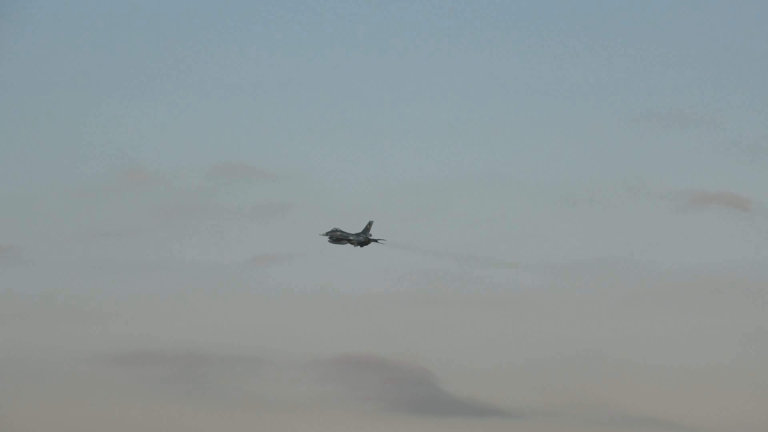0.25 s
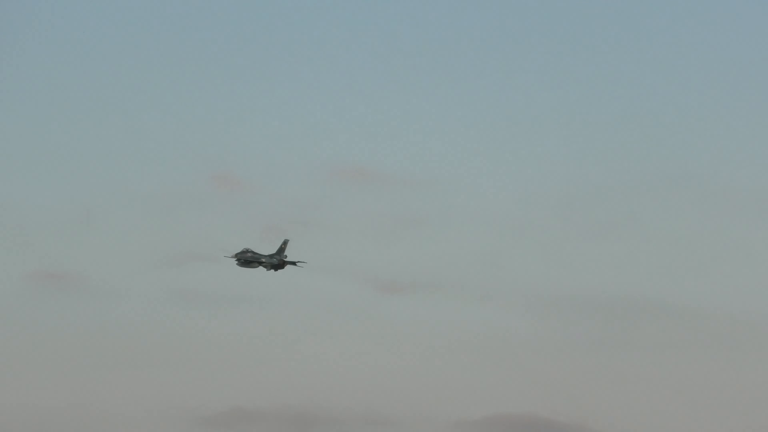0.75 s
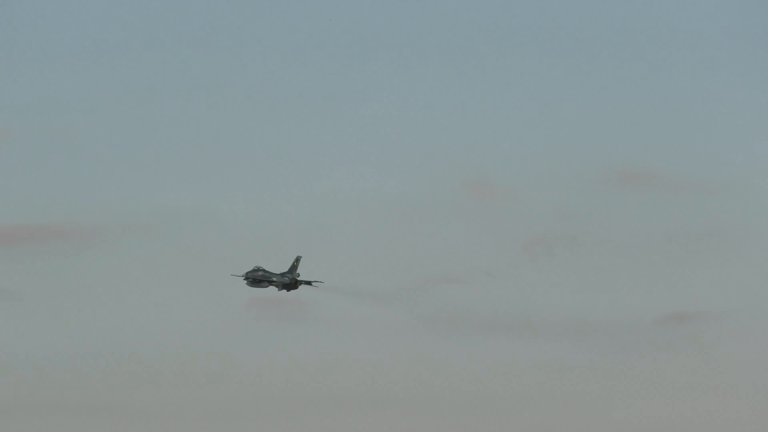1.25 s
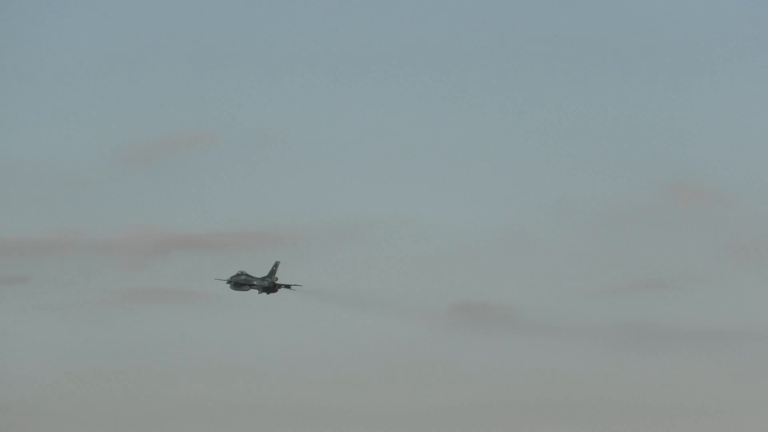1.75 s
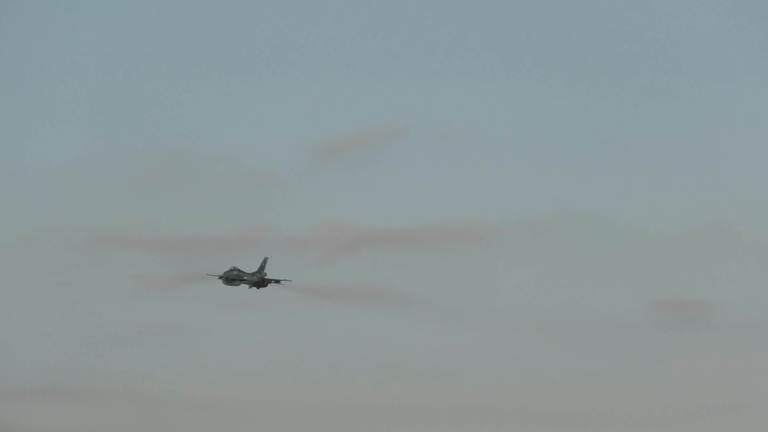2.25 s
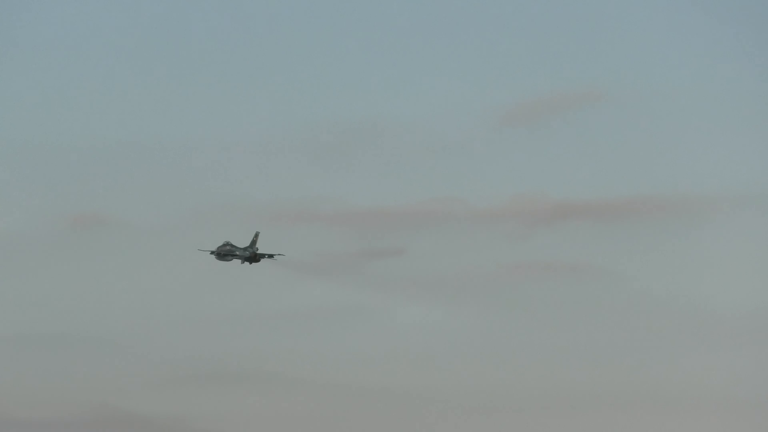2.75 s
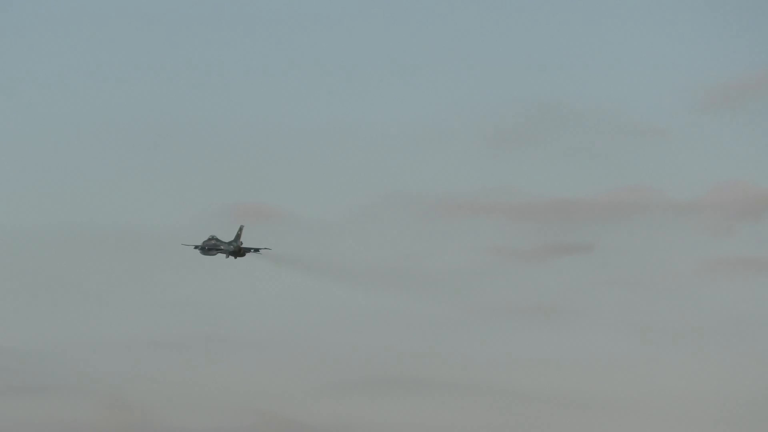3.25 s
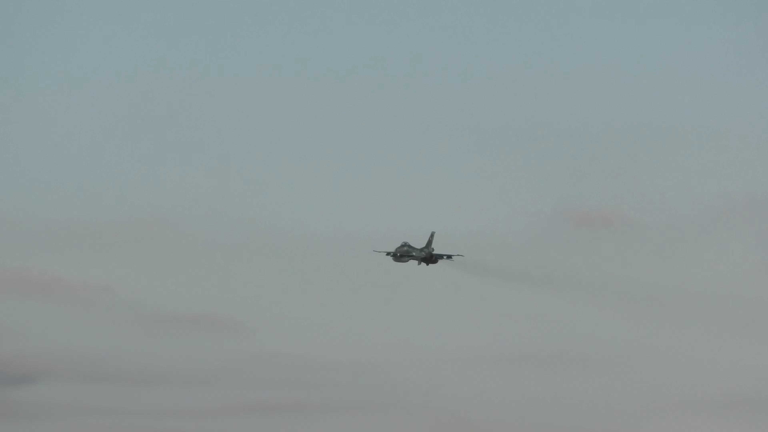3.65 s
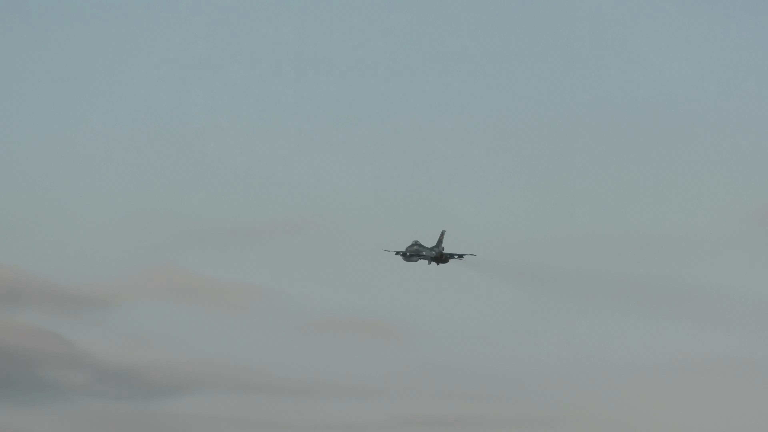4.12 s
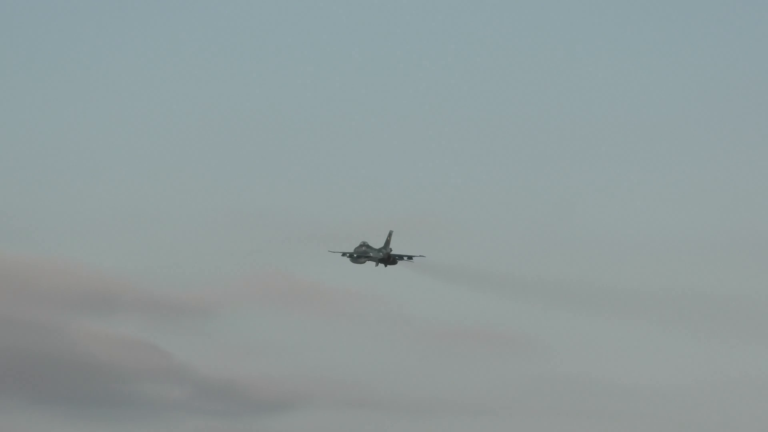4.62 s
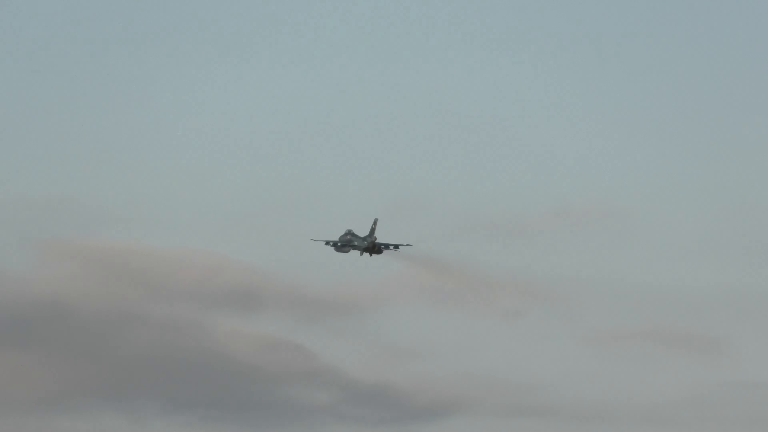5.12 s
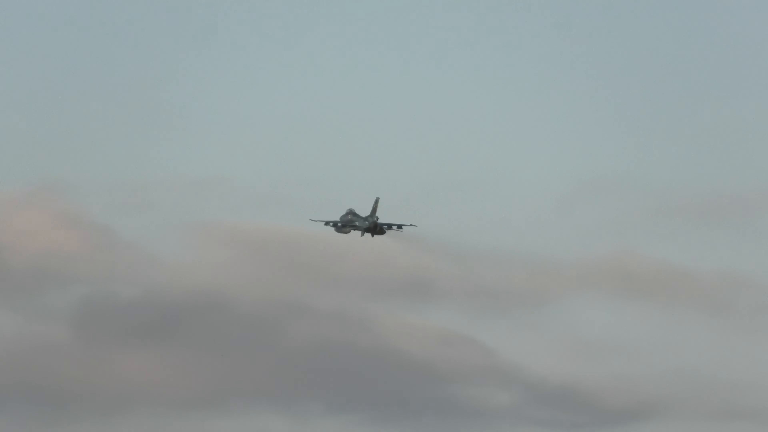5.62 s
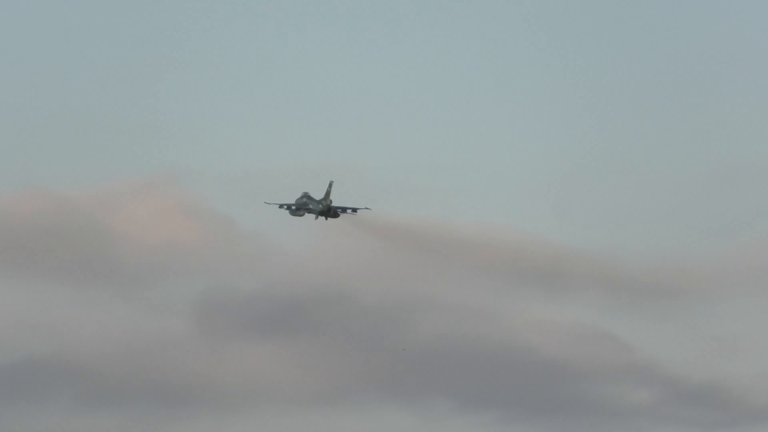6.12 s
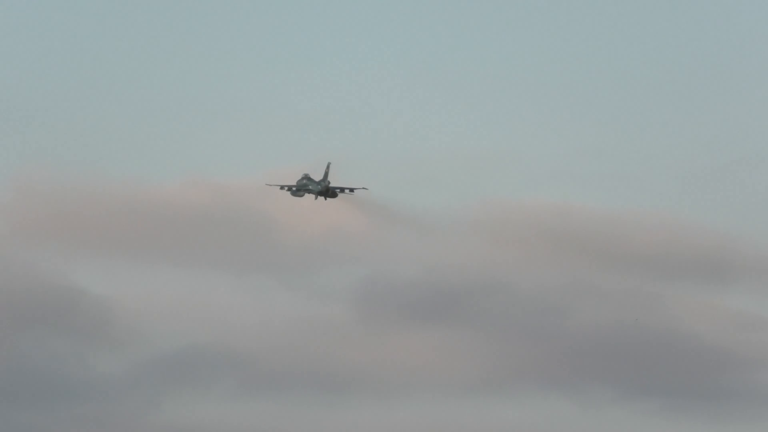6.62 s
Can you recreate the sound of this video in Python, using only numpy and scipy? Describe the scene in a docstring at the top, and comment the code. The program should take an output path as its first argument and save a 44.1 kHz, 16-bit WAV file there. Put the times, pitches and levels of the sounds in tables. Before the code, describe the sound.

A single jet fighter passes far off over an open grassy airfield. A thick roar and low rumble run throughout, covered by dense, ripping crackle. The first seconds are brightest, with sharp snapping bursts; pitch sinks between one and two seconds, then the crackle grows duller and more separated. A distant outdoor stereo microphone hears a hollow ground reflection and faint hiss.

```python
"""A far-off jet fighter rumbles, roars and crackles over an airfield, in bursts of steep shock fronts.
Turbulent mixing in the exhaust is shaped noise; the shock fronts are pressure jumps at random times.
The sound arrives directly and off the ground: the drifting lag sweeps a comb through the roar.
Scattering adds a treble hiss; two microphone ports hear the wave, and a quick gain control evens its level."""
import sys
import numpy as np
from scipy import signal
from scipy.fft import rfft, irfft, next_fast_len
from scipy.io import wavfile
from scipy.ndimage import uniform_filter1d, map_coordinates

SR = 44100
rng = np.random.default_rng(int(sys.argv[2]) if len(sys.argv) > 2 else 0)


def wav_out(sig):
    """Save sig, one row per channel (or a flat mono array), as 16-bit PCM at SR to the path in sys.argv[1]."""
    wavfile.write(sys.argv[1], SR, np.round(np.clip(np.atleast_2d(sig).T, -1, 1) * 32767).astype(np.int16))


N = 302967

# Relative colour of the steep shock edges: hz, level_db
SNAP_SPECTRUM = [(1200, -38), (2200, -4), (3000, -2), (4000, -1.5), (5000, -7.5), (6000, -9.5),
                 (7500, -19.5), (9000, -25), (12000, -25.5), (15000, -42.5)]
SHOCK_RANGE_DB = 10  # spread of the front sizes before merging


def amp(db):
    """A level in decibels is the logarithm of an amplitude ratio: return that ratio."""
    return 10 ** (np.asarray(db) / 20)


def unit(x):
    """Normalise the mean power: scale to rms 1."""
    return x / np.sqrt(np.mean(x ** 2) + 1e-20)


def along(points, hz):
    """Interpolate (hz, value) points on a logarithmic frequency axis."""
    f, v = np.transpose(points)
    return np.interp(np.log(hz + 1), np.log(f + 1), v)


def curves(rows):
    """Interpolate in time: one value per sample for each column after start_s."""
    s, *columns = np.transpose(rows)
    return [np.interp(np.arange(N) / SR, s, column) for column in columns]


def wobble(rate):
    """Band-limited random modulation: a spline through rate random knots a second."""
    knots = rng.standard_normal(int(N * rate / SR) + 4)
    return map_coordinates(knots, [np.arange(N) * rate / SR])


def filtered(x, response):
    """Linear filtering: multiply the spectrum of x by a complex response of frequency."""
    m = next_fast_len(N + SR // 2)
    spectrum = rfft(x, m) * response(np.fft.rfftfreq(m, 1 / SR))
    return irfft(spectrum, m)[..., :N]


def noise(spectrum, pitch):
    """Coloured noise of rms 1; reading it at a varying speed scales all its frequencies by pitch."""
    still = filtered(rng.standard_normal(N), lambda hz: amp(along(spectrum, hz)))
    return unit(map_coordinates(still, [np.cumsum(pitch)], mode="mirror"))


def running_rms(x, seconds):
    """Short-time level: the root of the power averaged twice over a sliding window."""
    width = max(int(seconds * SR), 2)
    power = uniform_filter1d(uniform_filter1d(x ** 2, width), width)
    return np.sqrt(np.abs(power) + 1e-12)


def bell(s, length):
    """Gaussian envelope in time, 1 at its centre and 1/e at half its length to either side."""
    return np.exp(-(2 * (np.arange(N) / SR - s) / length) ** 2)


def plume(rumble_db=-14.5, roar_db=0.0, flutter_db=0.4, doppler_share=.75):
    """Turbulent mixing behind the nozzle radiates broadband noise: a wandering rumble and a fluttering roar."""
    # Relative colour of the rumble: hz, level_db
    rumble_spectrum = [(12, -13), (25, -15.5), (55, -1), (85, 2), (115, 0.5), (160, 2), (235, 1), (290, -5),
                       (335, -7.5), (500, -11), (1200, -71), (4000, -130)]
    # Wandering weight of the rumble: start_s, pitch_factor
    rumble_pitch = [(0, 1.254), (.95, 1.204), (1.6, 1.05), (2.15, 1.0), (3.1, 0.99), (4.3, 1.02),
                    (5, 1.124), (5.8, 0.99), (6.87, 0.99)]
    # Relative colour of the roar: hz, level_db
    roar_spectrum = [(150, -41), (315, -8.5), (420, -1), (530, -3), (680, -0.5), (1000, -9.5), (1400, -11),
                     (2200, -26), (4000, -47), (8000, -130)]
    # Roar level before its offset and flutter: start_s, level_db
    roar_level = [(0.0, -18), (0.75, -18), (1.35, -19), (1.5, -24.5), (1.95, -19.5), (2.15, -23.5),
                  (2.33, -19), (2.75, -23.5), (3.1, -17.5), (3.3, -20.5), (3.55, -20), (4.1, -23),
                  (4.25, -17), (4.7, -24), (5.45, -19.5), (5.8, -24), (6.65, -23), (6.87, -26.5)]
    # Doppler shift as the jet swings past, before doppler_share: start_s, pitch_factor
    doppler = [(0, 1.25), (.5, 1.276), (1, 1.306), (1.5, 1.103), (2.2, 1.013), (3, 1.02), (4, 1.04),
               (5, 1.05), (6.87, 1.08)]

    rumble = amp(rumble_db) * noise(rumble_spectrum, curves(rumble_pitch)[0])
    level_db = curves(roar_level)[0] + roar_db + flutter_db * wobble(12)
    roar = amp(level_db) * noise(roar_spectrum, curves(doppler)[0] ** doppler_share)
    return rumble + roar


def boom():
    """Narrow-band noise: a band mostly near 150 Hz wanders in pitch and level inside the rumble."""
    # Path of the band: start_s, centre_hz, level_db
    boom_path = [(0, 200, -26), (.5, 190, -28.5), (.9, 185, -23), (1.25, 120, -20), (1.8, 97, -18.5),
                 (2.05, 140, -27.5), (2.25, 165, -20.5), (2.9, 151.8, -20.5), (3.45, 168.1, -20.5),
                 (4.15, 164, -17), (4.4, 142.1, -23.5), (5.2, 138.3, -29.5), (5.7, 155, -26.5),
                 (6.35, 147, -24), (6.87, 104.8, -23.5)]
    # Shape of the band before its pitch is moved: hz, level_db
    boom_shape = [(20, -120), (60, -50), (115, -22), (138, -5), (150, 0), (163, -5), (195, -22), (380, -70),
                  (1000, -170)]
    shape_centre_hz = 150

    centre_hz, level_db = curves(boom_path)
    return amp(level_db) * noise(boom_shape, centre_hz / shape_centre_hz)


def shocks(order=5):
    """Nonlinear steepening merges fronts: one in order, by chance, has swallowed its neighbours and stands out.

    Returns sample times and sizes in dB."""
    rate, spacing = 660, 1.8  # mean fronts a second; evenness of their gaps (1 = pure chance)
    merged_lead_db = 5
    gaps = rng.gamma(spacing, SR / rate / spacing, 2 * rate * N // SR)
    when = np.cumsum(gaps)
    merged = rng.random(len(when)) < 1 / order
    size_db = rng.uniform(-SHOCK_RANGE_DB, 0, len(when)) - merged_lead_db * ~merged
    inside = when < N - 1
    return when[inside], size_db[inside]


def fronts(when, strength, rise_us, spectrum, size=96):
    """A shock front is a hyperbolic-tangent pressure jump: its slope is a pulse as long as the rise time."""
    offset = np.arange(-size, size + 1)
    taps = when.astype(int)[:, None] + offset
    rise = rise_us[:, None] * SR / 10 ** 6  # samples
    steps = np.clip((taps - when[:, None]) / rise, -20, 20)
    slope = strength[:, None] / rise / np.cosh(steps) ** 2
    windowed = slope * np.hanning(len(offset))
    pulses = np.bincount((taps % N).ravel(), windowed.ravel(), N)
    # a quarter turn of phase makes each pulse a jump that relaxes again
    return filtered(pulses - pulses.mean(), lambda hz: -1j * amp(along(spectrum, hz)))


def crackle(when, size_db, crackle_db=-0.83, rasp_db=-3.0):
    """The blunt body of each front carries the lower frequencies: a dense rattle and a separately gusting rasp."""
    # Relative colour of the rattle: hz, level_db
    rattle_spectrum = [(200, -32.5), (680, 1.5), (880, 3.5), (1040, -1.5), (1380, 2.1), (1620, -1),
                       (2100, -17.5), (2700, -30.5), (3500, -34.5), (5000, -62.5), (9000, -110)]
    # Rattle level before crackle_db: start_s, level_db
    rattle_level = [(0.0, -31), (0.15, -20), (0.23, -38), (0.38, -23), (0.53, -31), (0.73, -20.5),
                    (0.83, -35), (1.38, -28), (1.47, -20), (2.05, -22), (2.5, -22.5), (2.63, -19),
                    (2.88, -26.5), (3.3, -22), (3.7, -22), (3.88, -20), (4.35, -29), (4.62, -22.5),
                    (4.8, -24.5), (5.05, -21.5), (5.25, -25.5), (5.45, -29), (5.68, -31), (5.8, -24.5),
                    (5.9, -26), (6.0, -23.5), (6.13, -31), (6.4, -22), (6.68, -32), (6.87, -31.5)]
    # Relative colour of the rasp near 2 kHz: hz, level_db
    rasp_spectrum = [(1100, -41), (1650, -2.5), (2050, 0.5), (2300, -1), (2700, -14), (3500, -18),
                     (5000, -43), (9000, -104)]
    # Rasp level before rasp_db: start_s, level_db
    rasp_level = [(0, -30), (.25, -33), (.34, -28), (.45, -31), (.8, -35.5), (.98, -27.5), (1.25, -32),
                  (1.42, -33.5), (1.58, -27), (1.85, -33), (2.05, -28.5), (2.3, -32.5), (2.55, -35),
                  (2.7, -23), (2.9, -34.5), (3.25, -33.5), (3.78, -34.5), (3.9, -26), (4.08, -35),
                  (4.45, -35.5), (4.6, -32), (5.0, -32), (5.4, -36.5), (5.6, -37), (5.8, -33), (6.5, -30),
                  (6.68, -40.5), (6.87, -37)]

    def body(spectrum, level_db):
        # compressed sizes, and one rise time of 30 us for all
        jumps = fronts(when, amp(.4 * size_db), np.full(len(when), 30.), spectrum)
        return amp(level_db) * jumps / running_rms(jumps, seconds=0.038)

    rattle = body(rattle_spectrum, curves(rattle_level)[0] + crackle_db)
    rasp = body(rasp_spectrum, curves(rasp_level)[0] + rasp_db)
    return rattle + rasp


def bursts():
    """Intermittency: the crackle tears in bursts, each a Gaussian swell and sharpening in dB."""
    # Bursts: peak_s, length_s, swell_db of the snaps, sharpen_db (shortening of their rise time)
    burst_rows = [(0.05, 0.18, 0.5, 8.5), (0.227, 0.24, 7, 10.0), (0.503, 0.1, 6.5, 4),
                  (0.805, 0.13, 4.5, 6.5), (0.971, 0.13, 6, 9), (1.183, 0.1, 7, 4.5),
                  (1.346, 0.084, 4.5, 5), (1.599, 0.14, 4.5, 1.5), (2.021, 0.44, 5, 6), (2.495, 0.14, 2, 5),
                  (2.71, 0.17, 7, 4.5), (2.887, 0.13, 4.5, 4), (3.344, 0.32, 6, 3.5), (3.6, 0.31, 8, 8.5),
                  (3.904, 0.25, 15.5, 5), (4.241, 0.087, 13, 0.0), (4.639, 0.24, 14, 4),
                  (4.87, 0.23, 10.5, 5.5), (5.138, 0.25, 6, 4.5), (5.506, 0.2, 11.5, 2.5),
                  (5.729, 0.26, 13, 1.5), (6.293, 0.18, 11, -0.5), (6.495, 0.12, 14.5, 1)]
    return sum(np.outer(db, bell(s, length)) for s, length, *db in burst_rows)


def snaps(when, size_db, snap_db=-1.26):
    """A shorter rise time means more treble: the fronts' edges are steeper when big, and sharpen in bursts."""
    # Distance weakens and dulls the edges; before bursts, size and snap_db:
    # start_s, level_db (around 3-5 kHz), rise_us
    edge = [(0.0, -38.5, 62), (0.65, -41.5, 46), (1.6, -41, 56), (2.35, -42.5, 86), (3.05, -43.5, 82),
            (3.72, -56, 148.5), (4.4, -53, 97), (5.33, -56, 134.5), (6.1, -52.5, 99), (6.55, -60.5, 89),
            (6.65, -63, 126), (6.87, -70, 74)]
    blunt_us_per_db = 1.4  # smaller fronts rise more slowly

    level_db, rise_us = curves(edge)
    swell_db, sharpen_db = bursts()
    sharpened_us = (rise_us * amp(-sharpen_db))[when.astype(int)]
    front_us = sharpened_us - blunt_us_per_db * (size_db + SHOCK_RANGE_DB / 4)
    jumps = fronts(when, amp(size_db), np.maximum(front_us, 14), SNAP_SPECTRUM)
    treble = filtered(jumps, lambda hz: 1 / (1 + ((hz - 4000) / 1000) ** 8))
    return amp(level_db + swell_db + snap_db) * jumps / running_rms(treble, seconds=.045)


def fade(x):
    """Propagation through turbulence: the air on the way takes some of the highs out for a moment."""
    # Fades: centre_s, length_s, depth_db, above_hz
    fade_rows = [(1.38, 0.075, 1.5, 1090), (2.48, 0.11, 1, 1690), (3.7, 0.13, 3.5, 1700),
                 (4.315, 0.049, 3.5, 1000), (5.245, 0.069, 2.5, 990), (5.48, 0.098, 5, 1680),
                 (5.92, 0.037, 6, 1320), (6.093, 0.077, 2, 1090), (6.557, 0.054, 3, 990)]

    def highs(edge_hz):
        return filtered(x, lambda hz: 1 - 1 / (1 + (hz / edge_hz) ** 8))

    return x - sum((1 - amp(-db * bell(s, length))) * highs(edge_hz)
                   for s, length, db, edge_hz in fade_rows)


def cracks(crack_db=-1.5):
    """An isolated steep shock is heard as a transient: single cracks stand out of the stream."""
    # Single fronts: start_s, size_db (before crack_db), rise_us
    crack_rows = [(.205, -1, 40), (.219, 1, 23), (0.226, -6, 24), (.262, -3, 23), (.297, 3, 24),
                  (.344, -3, 27), (.518, -4, 23), (.529, -4, 33), (0.761, -4, 24), (.815, 3, 25),
                  (0.949, -2, 28), (1.021, -2, 27), (1.203, -5, 23), (1.345, -7, 26), (1.37, -7, 26),
                  (1.605, -5, 51), (1.986, 0, 35), (2.051, 0, 33), (2.084, 2, 31), (2.456, -1, 39),
                  (2.488, -9, 40), (2.496, -6, 44), (2.53, -9, 40), (2.637, -2, 31), (2.717, 1, 38),
                  (2.856, -2, 38), (2.891, -1, 35), (3.029, -3, 46), (3.323, -11, 46), (3.593, -11, 42),
                  (3.639, -8.5, 42), (3.935, -2.5, 29), (3.961, -9.5, 34), (4.279, -9, 56),
                  (4.59, -7.5, 53), (4.675, 1.5, 50), (4.707, -2, 46), (4.833, -2, 54), (4.846, -14, 50),
                  (5.634, -7.5, 54), (5.695, -4, 61)]
    s, size_db, rise_us = np.transpose(crack_rows)
    return fronts(s * SR, amp(size_db + crack_db), rise_us, SNAP_SPECTRUM)


def ground(x):
    """Interference: a delayed bounce off the grass combs the direct sound; long waves have their own path."""
    # Bounce behind the direct sound, before turbulent waver and grass: start_s, lag_ms, share
    upper_path = [(0, 1.39, .85), (.2, 1.38, .8), (.38, 1.42, .62), (.6, 1.56, .5), (.88, 1.53, .66),
                  (1.13, 1.445, .88), (1.4, 1.445, .76), (1.75, 1.48, .88), (2.08, 1.42, .72),
                  (2.6, 1.44, .68), (2.75, 1.425, .48), (2.95, 1.55, .52), (3.3, 1.42, .78),
                  (3.95, 1.36, .8), (4.13, 1.37, .68), (4.26, 1.49, .55), (4.45, 1.37, .62),
                  (4.9, 1.375, .76), (5.12, 1.385, .52), (5.45, 1.5, .65), (6.2, 1.515, .72),
                  (6.87, 1.48, .55)]
    # The same for the long waves, which the grass colour leaves alone: start_s, lag_ms, share
    bass_path = [(0, 1.24, .75), (.45, 1.21, .9), (.8, 1.4, .65), (1.25, 1.42, .4), (1.6, 1.52, .6),
                 (2.15, 1.38, .55), (2.35, 1.75, .65), (2.75, 1.52, .6), (3.35, 1.42, .65), (3.9, 1.45, .4),
                 (4.35, 1.52, .7), (4.65, 1.38, .65), (5.1, 1.42, .75), (5.6, 1.42, .45), (6.87, 1.48, .5)]
    # What the grass gives back: hz, level_db
    grass = [(500, -11), (1000, -4.5), (2000, -3.5), (5000, -1.5), (10000, -19)]
    bass_hz = 560  # crossover between the paths
    waver_ms = .006 * wobble(8)  # turbulence shakes the lag

    def bass(hz):
        return 1 / (1 + (hz / bass_hz) ** 8)

    def upper(hz):
        return (1 - bass(hz)) * amp(along(grass, hz))

    def bounce(path, response):
        lag_ms, share = curves(path)
        heard = np.arange(N) - (lag_ms + waver_ms) * SR / 10 ** 3
        return share * map_coordinates(filtered(x, response), [heard], mode="mirror")

    return x + bounce(bass_path, bass) + bounce(upper_path, upper)


def ports(x):
    """Stereo from one wave: small phase and level differences between the ports, split evenly left and right."""
    # Phase by which the left port lags: hz, phase_rad
    port_phase = [(20, .05), (100, .07), (300, .2), (650, .3), (1000, .9), (1200, -.05), (2300, .9),
                  (2750, .38), (4000, .75), (5500, .35), (10000, .3)]
    # Left level minus right: hz, level_db
    port_balance = [(80, .5), (300, -.3), (500, -1.4), (700, -1), (950, -3.5), (1500, .2), (2100, -.3),
                    (2550, -3), (3200, -.5), (4000, -2), (5000, 0), (10000, 0)]

    def half(hz):
        return amp(along(port_balance, hz) / 2) * np.exp(-1j * along(port_phase, hz) / 2)

    return filtered(x, lambda hz: np.array([half(hz), 1 / half(hz)]))


def scatter(x, above_hz=5500):
    """Scattering by turbulent air and things on the field: a decaying random echo tail, different at each port."""
    t = np.arange(SR // 4) / SR
    tail = rng.standard_normal((2, len(t))) * amp(-60 * t / .12)  # down 60 dB in .12 s
    ends = signal.windows.tukey(N, .002)
    treble = filtered(x * ends, lambda hz: hz / np.hypot(hz, above_hz))
    return signal.fftconvolve(treble[None], tail / np.linalg.norm(tail[0]), axes=1)[:, :N]


def scene():
    """Superposition: the jet with its ground bounce, and the scattered hiss."""
    when, size_db = shocks()
    exhaust = plume() + boom()
    shock_stream = crackle(when, size_db) + snaps(when, size_db)
    jet = fade(exhaust + shock_stream) + cracks()
    return ports(ground(jet)) + amp(-14) * scatter(jet)


def record(dry, hold_db=-14.5, grip=0.61):
    """Dynamic compression partly evens out the swells; a faint flickering hiss and a band limit follow."""
    # Relative colour of the hiss: hz, level_db
    hiss_spectrum = [(100, 0), (4500, 2), (6200, 1), (7500, -4), (9000, -7), (12000, -8), (13000, -20),
                     (14000, -40)]
    # Level of the hiss: start_s, level_db
    hiss_level = [(0, -61), (2.4, -73), (3.2, -69.5), (4.5, -69), (5.4, -68.5), (5.63, -63.5), (5.75, -66),
                  (6.15, -64.5), (6.3, -73), (6.5, -74), (6.68, -64), (6.87, -70)]
    top_hz = 14500

    gain = (amp(hold_db) / running_rms(dry.mean(0), seconds=0.027)) ** grip
    flicker = amp(1.5 * wobble(250) + wobble(20))
    coloured = filtered(rng.standard_normal((2, N)), lambda hz: amp(along(hiss_spectrum, hz)))
    hiss = amp(curves(hiss_level)[0]) * unit(flicker * coloured)
    ends = signal.windows.tukey(N, .002)
    return filtered((dry * gain + hiss) * ends, lambda hz: hz < top_hz)


dry = scene()
out = record(dry)
wav_out(out)
```